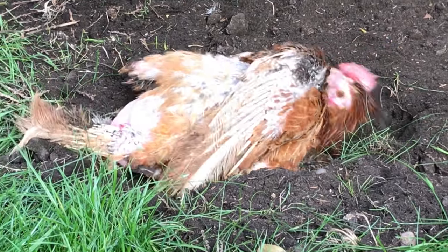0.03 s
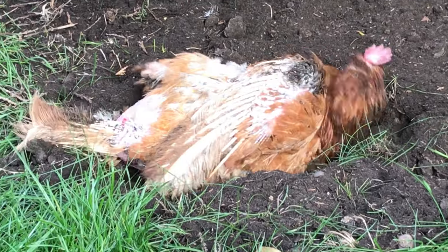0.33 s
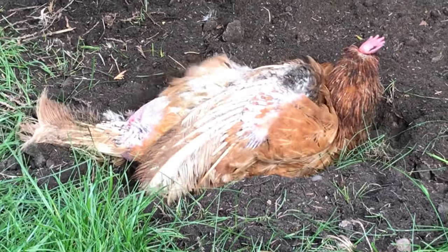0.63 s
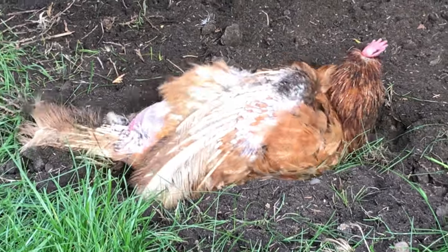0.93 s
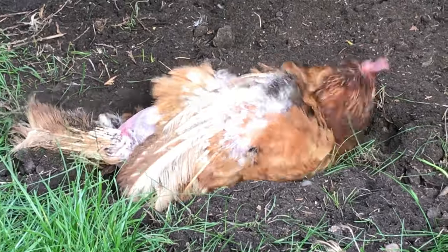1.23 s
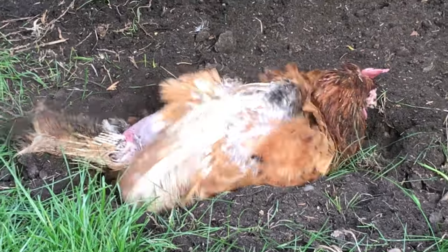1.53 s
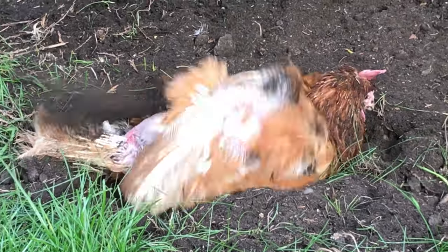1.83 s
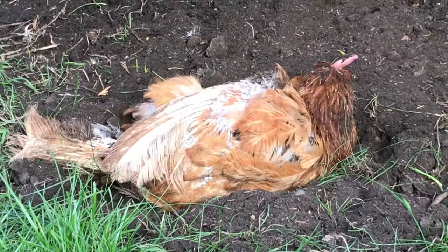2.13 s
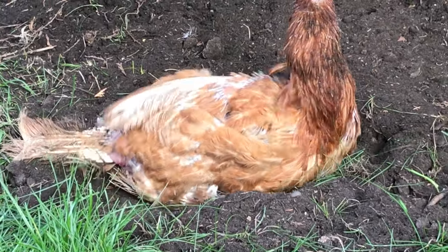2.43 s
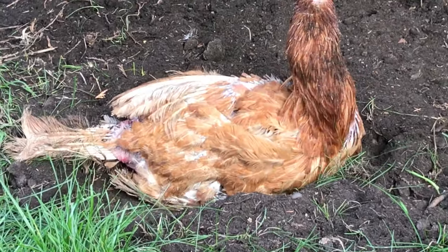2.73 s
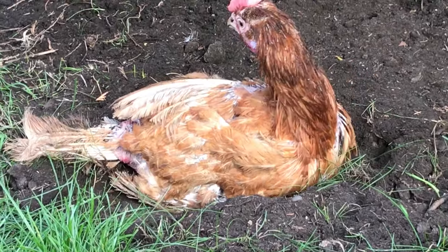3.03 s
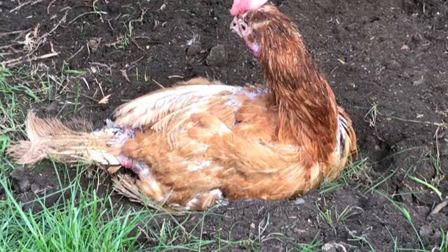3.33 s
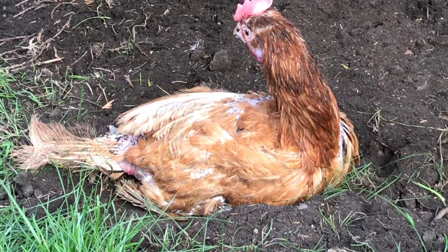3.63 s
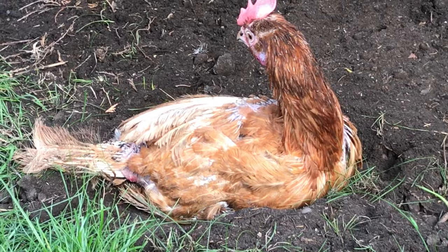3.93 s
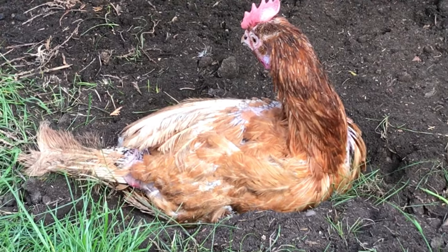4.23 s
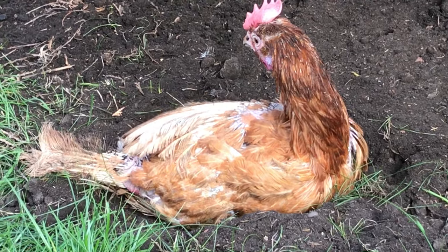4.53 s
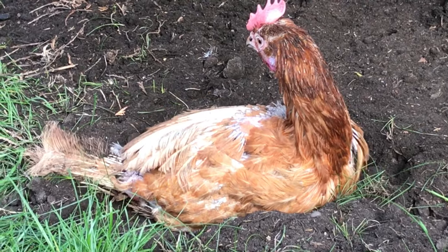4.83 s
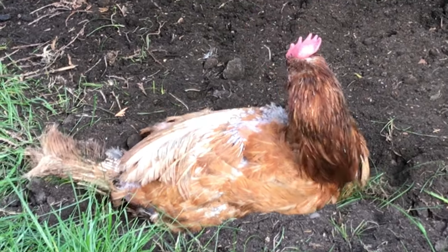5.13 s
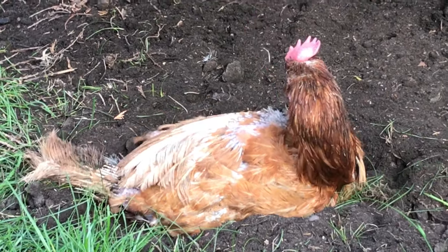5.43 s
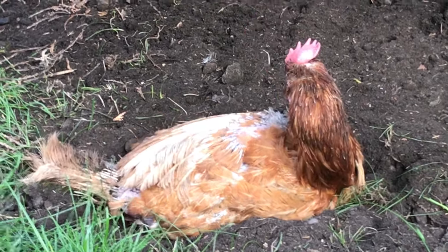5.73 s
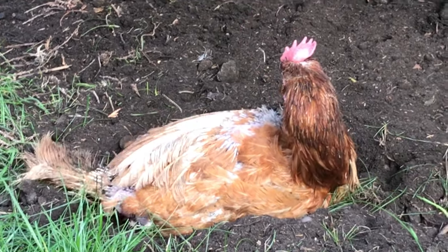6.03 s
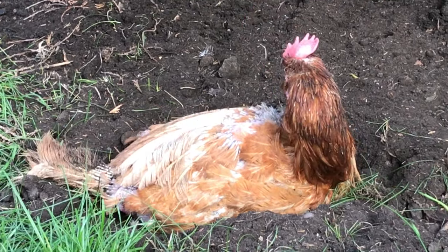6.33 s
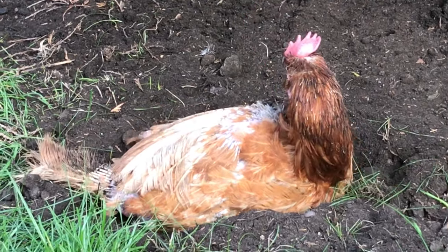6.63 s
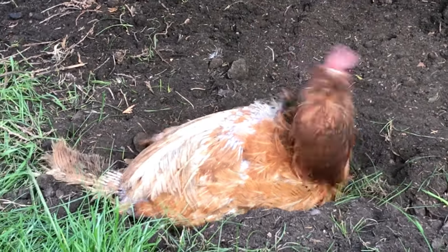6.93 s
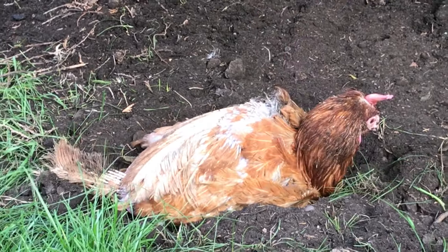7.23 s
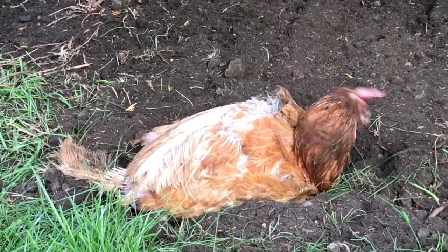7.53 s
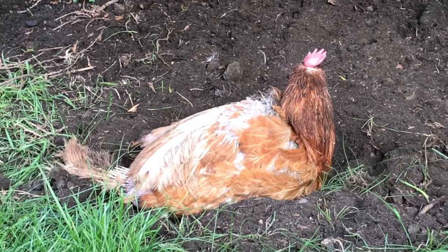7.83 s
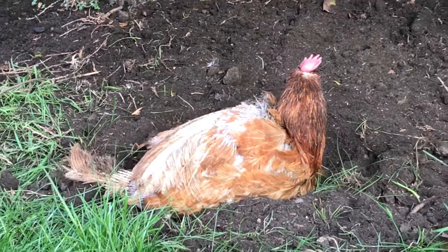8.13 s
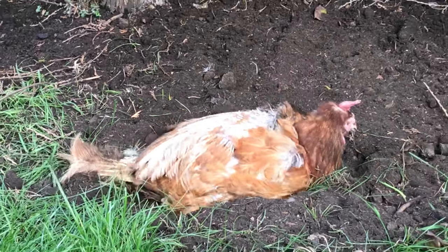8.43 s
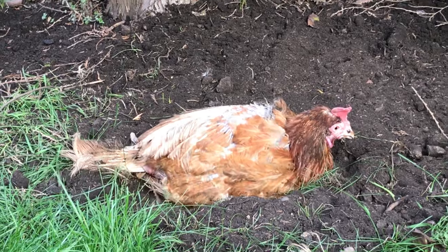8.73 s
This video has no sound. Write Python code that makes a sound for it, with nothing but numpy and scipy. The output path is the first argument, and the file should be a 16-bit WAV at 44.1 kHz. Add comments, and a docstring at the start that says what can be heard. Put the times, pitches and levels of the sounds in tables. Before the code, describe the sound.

A hen bathes in dry soil a metre or two from the microphone, outdoors. After a few faint bird chirps come light feather brushes and ticking crumbs of earth, then a soft thud and two briefly ringing knocks. A quick series of rustling wing shuffles follows. She settles to occasional ticks and dull bumps, while a distant engine, droning throughout over a murmur of traffic, swells.

```python
"""A garden, the microphone a metre or two from a hen dust-bathing in dry soil.
Far traffic murmurs and an engine drones throughout; at the start a small bird chirps behind her.
From about 1 s grit ticks and her feathers brush lightly; just after 2 s come a dull bump and two
sharp, ringing knocks. From 3 s she shuffles her wings in a run of firm strokes. After 5 s the far
engine labours louder over the last few ticks and bumps."""
import sys
import numpy as np
from scipy import signal
from scipy.fft import rfft, irfft
from scipy.io import wavfile
from scipy.ndimage import uniform_filter1d

SR = 44100
rng = np.random.default_rng(int(sys.argv[2]) if len(sys.argv) > 2 else 0)


def log_audio(samples):
    """Write samples as a 16-bit WAV file to the path given in sys.argv[1]."""
    # one column per channel
    frames = np.atleast_2d(samples).T
    # limit to full scale, then quantise
    limited = np.clip(frames, -1, 1)
    pcm = np.round(limited * 32767).astype(np.int16)
    wavfile.write(sys.argv[1], SR, pcm)


N = 391166
TIME = np.arange(N) / SR


def undb(db):
    """Decibels to gain."""
    return 10 ** (np.asarray(db) / 20)


def unit(x):
    """Scale to rms 1."""
    return x / np.sqrt(np.mean(x ** 2))


def colour(x, points):
    """Shape a sound by a spectrum of (frequency [Hz], level [dB]), rolled off below 20 Hz; rms 1."""
    hz, db = np.transpose(points)
    f = np.maximum(np.fft.rfftfreq(len(x), 1 / SR), 1)
    gain = undb(np.interp(np.log(f), np.log(hz), db))
    low_cut = f ** 2 / (f ** 2 + 20 ** 2)
    return unit(irfft(rfft(x) * gain * low_cut, len(x)))


def resonate(x, hz, width_hz):
    """One resonance, gain 1 at its centre."""
    angle = 2 * np.pi * hz / SR
    k = np.sin(angle) * width_hz / hz / 2
    return signal.lfilter([k, 0, -k], [1 + k, -2 * np.cos(angle), 1 - k], x)


def noise(size=N):
    """White noise."""
    return rng.standard_normal(size)


def walk(per_s):
    """Smooth random drift through per_s values a second; rms 1."""
    hold = int(SR / per_s)
    steps = np.repeat(noise(N // hold + 1), hold)[:N]
    return unit(uniform_filter1d(uniform_filter1d(steps, hold), hold))


def fade(t, t60):
    """Exponential decay, 60 dB down after t60 seconds."""
    return np.exp(-np.log(1000) * t / t60)


def onset(t, rise_s):
    """Exponential rise from 0 towards 1."""
    return 1 - np.exp(-t / rise_s)


def add(out, s, x):
    """Mix a sound in at s seconds."""
    i = int(s * SR)
    out[i:i + len(x)] += x[:len(out) - i]


def traffic(roar_db_per_s=0.3529, rumble_db_per_s=0.2, car_hz=1400, hum_hz=100):
    """Tyre roar and rumble grow on far roads and one car slowly draws nearer, over a mains hum."""
    # spectra of the tyre roar and the low rumble: (frequency [Hz], relative level [dB])
    roar_spectrum = [(200, -9), (420, -6), (620, 1), (800, 0), (1020, 2.5), (1250, -3), (1650, -5.5),
                     (1950, -10.5), (3000, -17), (4500, -24.5), (8000, -46)]
    rumble_spectrum = [(20, -16), (32, 2), (48, 5.5), (75, 5.5), (110, -2), (150, -6.5), (220, -12.5),
                       (320, -16.5), (500, -24), (1000, -47)]
    roar = colour(noise(), roar_spectrum) * undb(-65 + roar_db_per_s * TIME + .5 * walk(9))
    rumble = colour(noise(), rumble_spectrum) * undb(-55 + rumble_db_per_s * TIME)
    tyres = unit(resonate(resonate(noise(), car_hz, 800), car_hz, 1200))
    relative_distance = 1 + (TIME[-1] - TIME) / 2
    car = tyres * undb(-69) / relative_distance
    hum = unit(np.sin(2 * np.pi * hum_hz * TIME)) * undb(-63 + 1.5 * walk(4.3))
    return roar + rumble + car + hum


def engine(waver=.022, flutter_db=1.8, echo_db=-9, echo_s=.21):
    """Only a far exhaust's lowest orders carry; they flutter on the way and beat against their echo."""
    # it pulls up, eases off, then labours louder: (time [s], firing rate [Hz], relative level [dB])
    load = [(0, 54.35, -54), (.5, 58, -49.5), (1.1, 56, -64), (3.3, 57, -56), (3.85, 58, -50.5),
            (4.7, 59.03, -51.5), (5.1, 62, -54.5), (5.35, 63, -43), (5.8, 61.5, -47), (6.05, 54.1, -51.5),
            (6.45, 53, -46), (6.95, 56, -39.5), (7.4, 55.36, -43), (8, 54.9, -40.5), (8.35, 54.7, -45.5),
            (8.87, 55.7, -44.5)]
    s, firing_hz, level_db = np.transpose(load)
    hz = np.interp(TIME, s, firing_hz) * (1 + waver * walk(14))
    phase = 2 * np.pi * np.cumsum(hz) / SR
    tone = np.sin(phase) + undb(-19) * np.sin(2 * phase) + undb(-27) * np.sin(3 * phase)
    throb = tone + undb(echo_db) * np.interp(TIME - echo_s, TIME, tone)
    return unit(throb) * undb(np.interp(TIME, s, level_db) - 2.5 + flutter_db * walk(22))


def high_pips(per_s=30, uneven_db=3):
    """Trains of faint, very high pips: narrow bands of noise, pulsing unevenly."""
    # pip trains: (start [s], end [s], frequency [Hz], relative level [dB])
    trains = [(0, 6.96, 10000, -84.5), (.76, .83, 12550, -78.5), (6.97, 7.6, 12550, -84),
              (7.73, 8.02, 12550, -83.5), (8.23, 8.41, 12650, -82), (8.5, 8.84, 12650, -85)]
    out = np.zeros(N)
    for start, end, hz, db in trains:
        band = unit(resonate(resonate(noise(), hz, hz / 13), hz, hz / 6))
        out += undb(db) * band * ((TIME > start) & (TIME < end))
    pulses = np.cos(np.pi * per_s * TIME) ** 2
    return out * pulses * undb(uneven_db * walk(45) - 1)


def microphone_hiss(level_db=-77):
    """The microphone's own steady noise."""
    # self-noise spectrum: (frequency [Hz], relative level [dB])
    spectrum = [(1000, -2.5), (3500, 2.5), (6000, 0), (9000, -2), (12000, -5), (15500, -5.5)]
    return undb(level_db) * colour(noise(), spectrum)


def bird(low_hz=3150, high_hz=4800, length_s=.055, every_s=.076, step_db=-0.8):
    """A small bird far behind the hen: harsh rising chirps, each weaker, blurred by garden echoes."""
    # phrases of three chirps: (time [s], relative level [dB])
    phrases = [(.105, -68), (.355, -69.5)]
    out, t = np.zeros(N), TIME[:int(length_s * SR)]
    swell = np.sqrt(np.sin(np.pi * t / length_s))
    for s, db in phrases:
        for k in range(3):
            hz = np.linspace(low_hz, high_hz, len(t)) * (1 + .03 * rng.standard_normal())
            rasp = .7 + unit(resonate(noise(len(t)), 350, 700))
            chirp = np.sin(2 * np.pi * np.cumsum(hz) / SR) * rasp * swell
            add(out, s + k * every_s, undb(db - 3 + k * step_db) * chirp)
    return undb(-4) * out + garden_echo(out, t60=0.29)


def garden_echo(x, t60):
    """Diffuse echo from the ground, fences and plants."""
    echo = noise(SR // 2) * fade(TIME[:SR // 2], t60)
    return signal.fftconvolve(x, echo / np.linalg.norm(echo))[:N]


def loose_grit(dig_from_s=1.1, dig_to_s=2.6, dig_per_s=12, rest_per_s=1.2, centre_hz=7500, t60=.014):
    """Rows for grit(): small grains come loose at random, thicker and louder while her feet dig."""
    digging = (TIME > dig_from_s) & (TIME < dig_to_s)
    loose = rng.random(N) < np.where(digging, dig_per_s, rest_per_s) / SR
    levels_db = np.where(digging, -64, -67)[loose]
    chance = rng.uniform(-0.91, 1, (len(levels_db), 2))
    return [(s, db + 3 * size, centre_hz * 2 ** (.7 * pitch), t60)
            for s, db, (size, pitch) in zip(TIME[loose], levels_db, chance)]


def grit(click_db=12, scatter_db=-4):
    """A crumb or stalk gives way with a click, and finer dust scatters after it."""
    # larger crumbs and dry stalks: (time [s], relative level [dB], centre [Hz], scatter t60 [s])
    snaps = [(.867, -59, 4970, .05), (1.408, -58.5, 4960, 0.055), (1.599, -53.5, 6530, 0.085),
             (1.771, -64, 6000, .02), (1.867, -63, 4500, 0.027), (2.279, -61, 6000, .015),
             (2.292, -42, 12500, 0.015), (2.296, -51, 12000, 0.057), (2.322, -57.5, 6000, 0.032),
             (3.143, -58, 7000, .015), (4.807, -62, 11130, 0.016), (5.3, -67, 11000, .014),
             (5.872, -57.5, 1800, .025)]
    out, t = np.zeros(N), TIME[:SR // 10]
    for s, db, hz, t60 in snaps + loose_grit():
        click = resonate(signal.unit_impulse(len(t)), hz, width_hz=hz)
        click /= abs(click).max()
        scatter = unit(resonate(noise(len(t)), hz, 1.4 * hz)) * fade(t, t60) * onset(t, 0.00031)
        add(out, s, undb(db) * (undb(click_db) * click + undb(scatter_db) * scatter))
    return out


def grains(per_s, spread_db):
    """Random tiny clicks, a few much larger than the rest; rms 1."""
    size = undb(spread_db * np.minimum(rng.exponential(size=N), 5))
    return unit((rng.random(N) < per_s / SR) * size * rng.choice([-1, 1], N))


def brush(middle_s, length_s, db, skirt=1.9):
    """Power of one brush; feathers start and stop sliding one after another, so it has long skirts."""
    offset = 2 * (TIME - middle_s) / length_s
    return undb(db) ** 2 * (1 + (2 ** (1 / skirt) - 1) * offset ** 2) ** -skirt


def feathers(return_db=2.7, firm_db=-57):
    """Close by, barbs slide over each other and through dust: tiny slips that swell with each stroke."""
    # wing shuffles, each a push and a firmer return:
    # (time of push [s], level [dB], delay of return [s], length of each brush [s])
    shuffles = [(1.125, -73, 0.05, 0.088), (1.42, -74, 0.15, 0.14), (1.75, -75.5, .04, 0.17),
                (1.862, -71.5, .055, 0.048), (2.12, -75, .085, 0.11), (2.47, -76.5, .05, .1),
                (3.078, -64.5, 0.022, .055), (3.243, -62.5, .06, .043), (3.449, -62.3, .072, .054),
                (3.657, -62.5, 0.067, 0.05), (3.868, -60, 0.072, 0.039), (4.083, -59, 0.067, 0.031),
                (4.389, -60.5, 0.036, 0.051)]
    # a light brush of the barbs, a firm stroke that bends the quills: (frequency [Hz], gain [dB])
    light_spectrum = [(500, -19), (1500, -8), (2500, -1.5), (3800, -8.5), (5500, -2), (9000, 0), (12000, 0),
                      (15800, 2.5)]
    firm_spectrum = [(500, -13), (1500, -6), (2500, -1), (3800, 4), (5500, -2), (9000, 0.5), (12000, -3),
                     (14000, -8), (15800, -12)]
    power = sum(brush(s, length, db) + brush(s + delay, length, db + return_db)
                for s, db, delay, length in shuffles)
    effort = np.sqrt(power)
    barbs = grains(per_s=8300, spread_db=1.5)
    dust = grains(per_s=400, spread_db=3.5)  # coarser crumbs caught between the vanes
    slips = barbs + 0.57 * dust
    firmness = np.minimum(np.sqrt(effort / undb(firm_db)), 1)
    texture = (1 - firmness) * colour(slips, light_spectrum) + firmness * colour(slips, firm_spectrum)
    catching = undb(1.75 * walk(140))  # vanes catch and let go
    rustle = texture * effort * catching
    return rustle + undb(-13) * resonate(garden_echo(rustle, t60=0.75), 3000, 3000)


def bumps(t60=0.13):
    """Soft, dull thuds: bursts of narrow-band noise that die away quickly."""
    # thuds: (time [s], level [dB], frequency [Hz])
    thuds = [(2.094, -50, 150), (3.41, -49, 164.4), (3.868, -53, 206), (5.164, -50.5, 167.2),
             (5.871, -57, 910), (7.104, -55, 237), (7.189, -54, 190), (8.125, -50, 150)]
    out, t = np.zeros(N), TIME[:SR // 4]
    for s, db, hz in thuds:
        thud = unit(resonate(resonate(noise(len(t)), hz, 130), hz, 200))
        add(out, s, undb(db) * thud * fade(t, t60) * onset(t, 0.0008))
    return out


def knocks(click_hz=3600, clatter_t60=0.056):
    """A contact click rings something hard and hollow; the spot struck decides which modes ring most."""
    # strikes: (time [s], ring gain [dB], click gain [dB], spot struck [0 or 1])
    strikes = [(2.2413, -45, -30, 0), (2.4323, -46, -49, 1)]
    # its modes: (frequency [Hz], t60 [s], gain at spot 0 [dB], gain at spot 1 [dB])
    modes = [(620, 0.049, -2.5, -8), (960, 0.023, -16, -2), (1160, 0.064, 1, -24), (1410, 0.032, -18, 3),
             (1610, 0.067, -14, -26), (2128, 0.055, 3, 0.5), (2770, 0.037, -6, -14), (3140, 0.036, -9, -8),
             (3480, 0.062, -22, -15), (3860, 0.032, -12, -31), (4740, .02, -4, -20), (5437, 0.023, -4, -36),
             (7025, .03, -22, -42), (8974, .03, -27, -45)]
    out, t = np.zeros(N), TIME[:SR // 5]
    for s, ring_db, click_db, spot in strikes:
        ring = sum(undb(spot_db[spot]) * np.sin(2 * np.pi * (hz * t + rng.random())) * fade(t, t60)
                   for hz, t60, *spot_db in modes)
        click = resonate(np.exp(-t / .00006), click_hz, 3000)
        click /= abs(click).max()
        # the ground and nearby things scatter the click
        clatter = undb(-19) * resonate(noise(len(t)), click_hz, 5000) * fade(t, clatter_t60)
        contact = clatter - 1.16 * click
        add(out, s, undb(ring_db) * ring * onset(t, 0.00052) + undb(click_db) * contact)
    return out


def scene():
    """The hen close by, the garden and roads behind her, and the microphone's own hiss; mono."""
    hen = feathers() + grit() + knocks() + bumps()
    return (hen + bird() + engine() + traffic() + high_pips() + microphone_hiss())[None]


def record(dry):
    """The microphone port carves shallow dips in the treble; the top is cut at 15.6 kHz."""
    # dips of the port: (frequency [Hz], width [Hz], gain [dB])
    port_dips = [(4920, 170, -3), (7670, 500, -3), (10500, 350, -4)]
    f = np.fft.rfftfreq(N, 1 / SR)
    port_db = sum(db * np.exp(-((f - hz) / width) ** 2) for hz, width, db in port_dips)
    heard = irfft(rfft(dry) * undb(port_db), N)
    top_cut = signal.ellip(10, .2, 70, 15600, fs=SR, output="sos")
    return signal.sosfilt(top_cut, heard)


dry = scene()
out = record(dry)
log_audio(out)
```